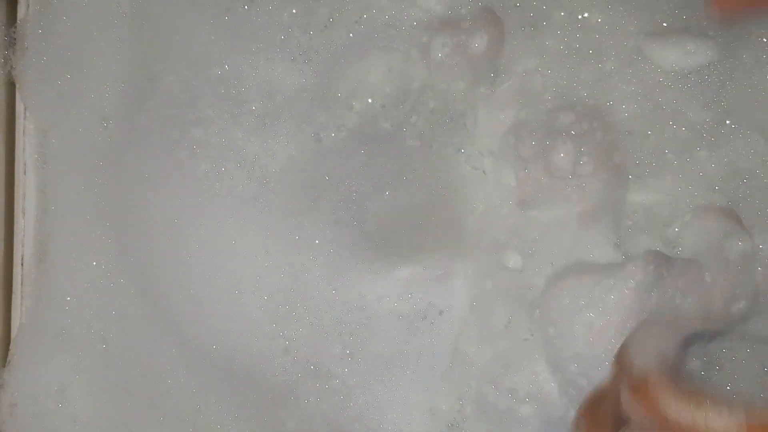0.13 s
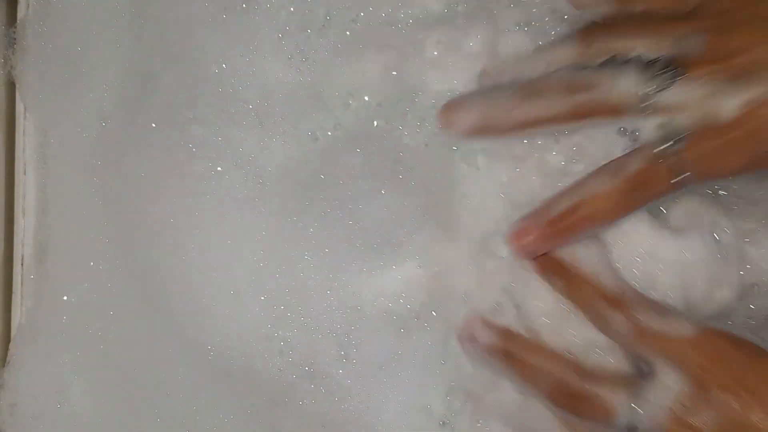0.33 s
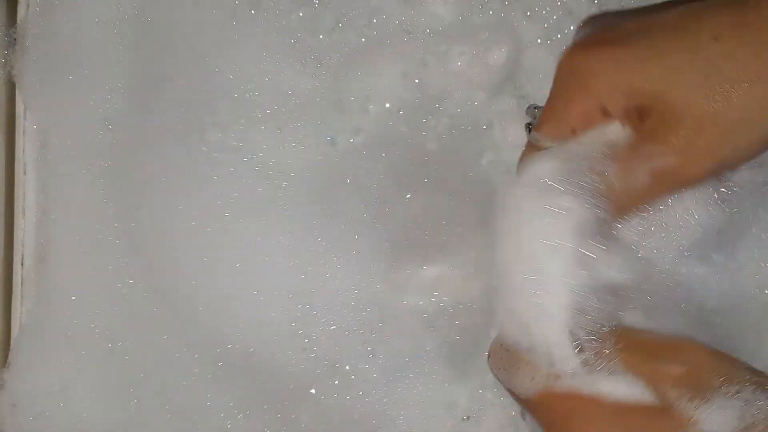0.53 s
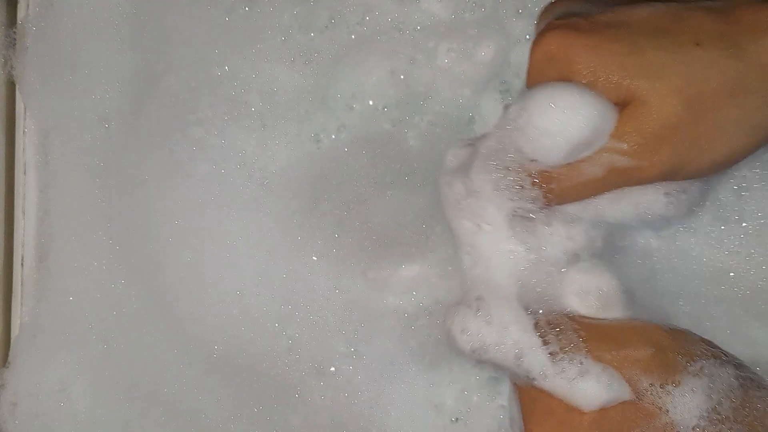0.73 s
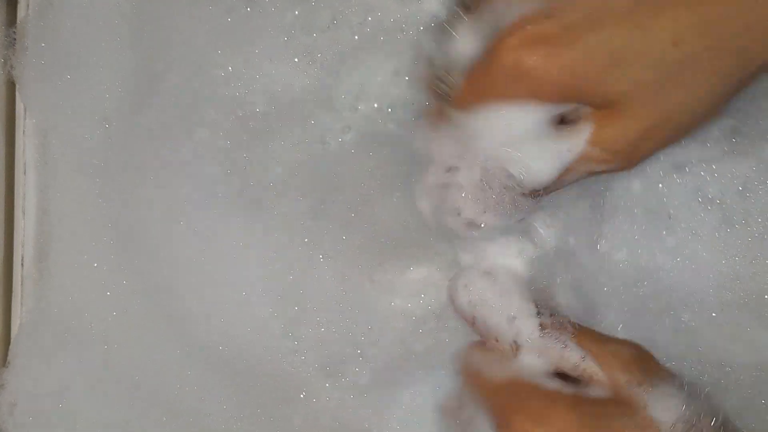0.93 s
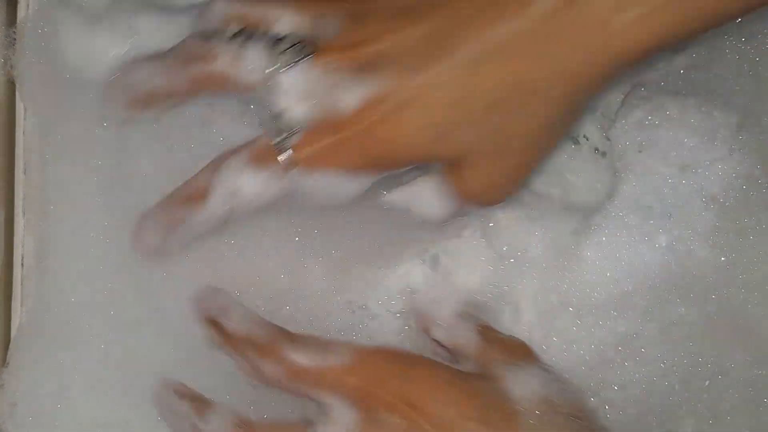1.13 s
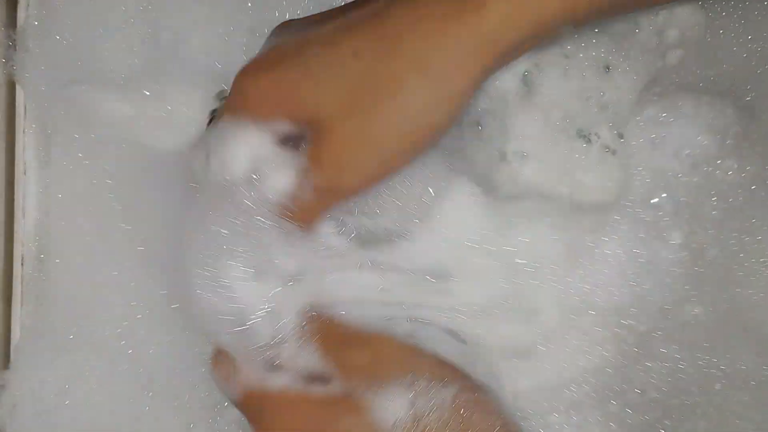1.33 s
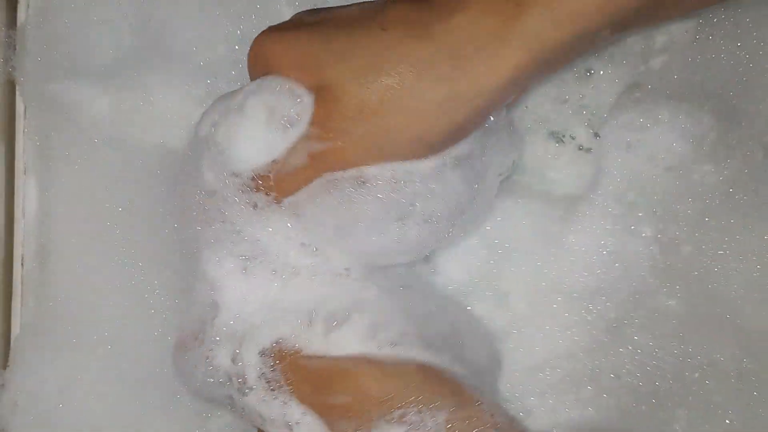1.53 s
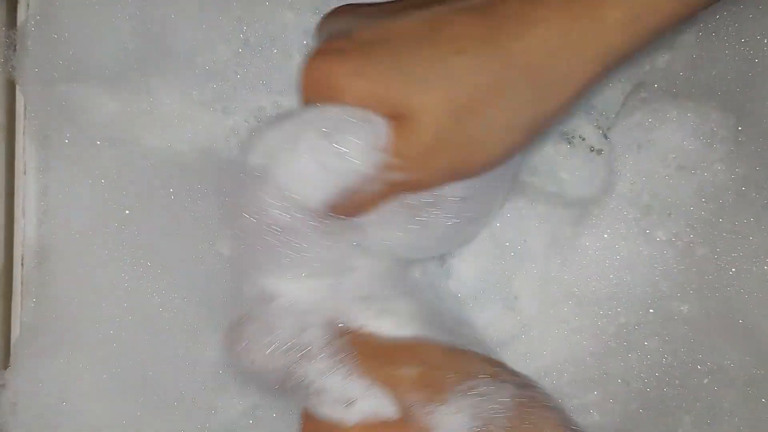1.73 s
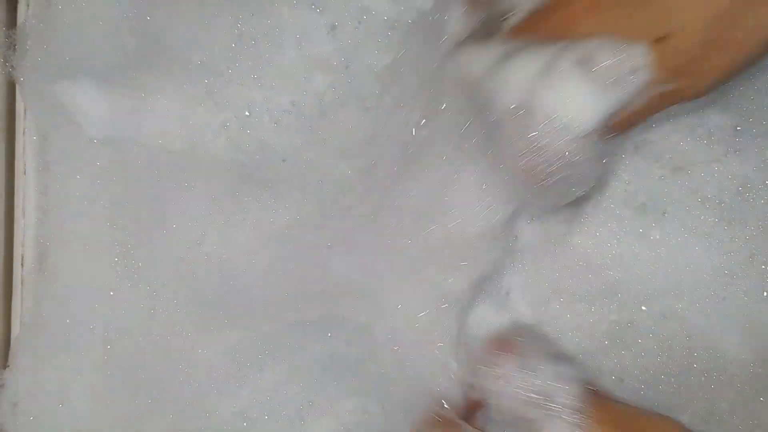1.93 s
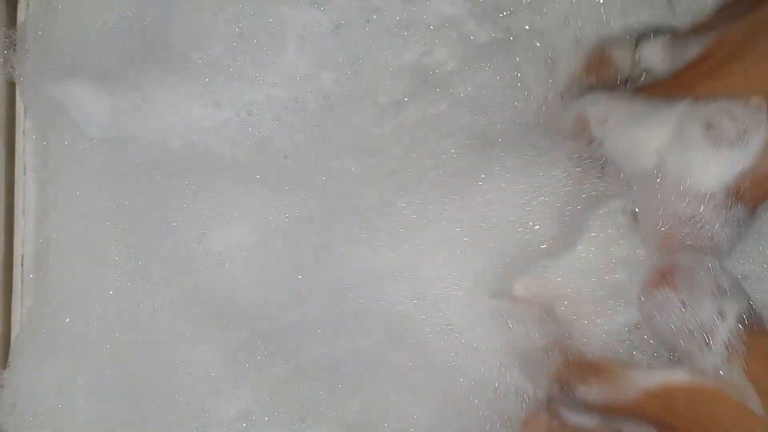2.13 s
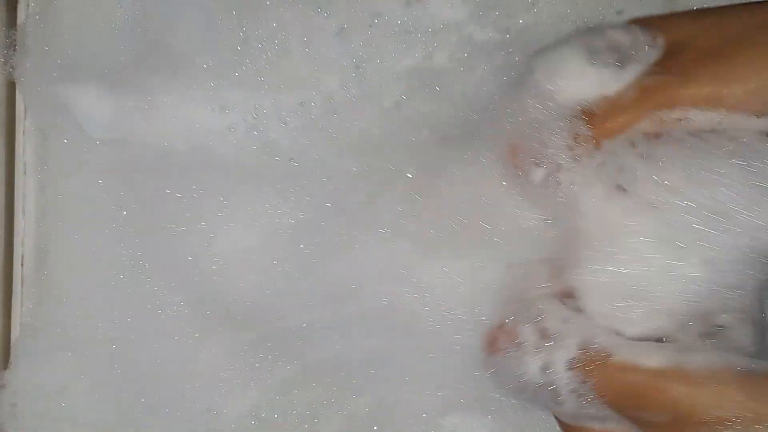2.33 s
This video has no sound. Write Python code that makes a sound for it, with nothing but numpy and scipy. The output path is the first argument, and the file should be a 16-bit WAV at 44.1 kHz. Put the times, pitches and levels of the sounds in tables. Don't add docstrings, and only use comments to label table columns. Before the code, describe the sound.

A soapy sponge is squeezed in foam, heard very close. A faint stroke tail and soft gulp come by 0.15 seconds, a full squelchy squeeze at 0.7-0.9, a gulping release at 1.0, a longer, brighter wet squeeze at 1.6-1.75 ending in sharp bubble ticks, and a short gulp at 1.87. Fine foam crackles between, over a slowly rising low engine drone, with short tiled-room reverberation.

```python
import sys
import numpy as np
from scipy import signal
from scipy.fft import rfft, irfft
from scipy.io import wavfile
from scipy.ndimage import uniform_filter1d

SR = 44100
rng = np.random.default_rng(int(sys.argv[2]) if len(sys.argv) > 2 else 0)


def rack_gain(trim_db):
    fader = np.asarray(trim_db, float)
    return 10 ** (fader / 20)


def inscribe(sig):
    pcm = np.round(np.clip(np.atleast_2d(sig).T, -1, 1) * 32767)
    wavfile.write(sys.argv[1], SR, pcm.astype(np.int16))


N = 105840

# start_s, level_db
FOAM_LEVEL = [(0, -83), (.19, -66), (.24, -77), (.32, -77.5), (.345, -72), (.55, -66.5), (.62, -71.5),
              (1.06, -68.5), (1.18, -74.5), (1.33, -71), (1.42, -65), (1.95, -70), (2.06, -74.5),
              (2.17, -70.5), (2.4, -77.5)]


def evened(x):
    return x / np.sqrt(np.mean(x ** 2) + 1e-20)


def read(points, hz):
    f, value = np.transpose(points)
    return np.interp(np.log(hz + 1), np.log(f + 1), value)


def add(mix, start_s, sound):
    part = mix[round(start_s * SR):][:len(sound)]
    part += sound[:len(part)]


def colour(x, gain_db):
    hz = np.fft.rfftfreq(x.shape[-1], 1 / SR)
    return irfft(rfft(x) * rack_gain(gain_db(hz)), x.shape[-1])


def high_pass_db(hz, corner_hz, floor):
    return 40 * np.log10(np.minimum(hz / corner_hz + floor, 1))


def bubble(hz, cycles, rise):
    u = np.arange(0, 5, hz / cycles / SR)
    envelope = (1 - np.exp(-6 * u)) * np.exp(-1.5 * u)
    return envelope * np.sin(2 * np.pi * cycles * (u + rise * u ** 2 / 2))


def grains(spectrum, per_s, cycles, spread_db, sizes=30):
    out = np.zeros(N)
    for hz in np.geomspace(spectrum[0][0], spectrum[-1][0], sizes):
        when, size = rng.random(N), rng.exponential(1, N)
        stretch, rise = rng.uniform(0.23, 1.59, 2)
        bursts = when < per_s * np.sqrt(hz / 1000) / sizes / SR
        train = bursts * rack_gain(spread_db * np.minimum(size, 4))
        one = bubble(hz, cycles * stretch, 0.12 * (rise - .8))
        sound = signal.oaconvolve(train, one / np.linalg.norm(one))[:N]
        out += rack_gain(read(spectrum, hz)) * hz ** 0.0807 * sound
    return evened(out)


def place(x, lag_samples, pan_db):
    wide, half = np.pad(x, 20), round(lag_samples / 2)
    left = np.roll(wide, half) * rack_gain(pan_db / 2)
    right = np.roll(wide, -half) * rack_gain(-pan_db / 2)
    return np.array([left, right])[:, 20:-20]


def air():
    # freq_hz, density_db_per_hz
    hiss_spectrum = [(250, 7), (400, -4), (700, -15.5), (1100, -21.5), (3400, -29), (8000, -32),
                     (15800, -24.5)]
    a, b, common = rng.standard_normal((3, N))
    ports = np.array([a + .5 * common, b + .5 * common])
    hiss = colour(ports, lambda hz: read(hiss_spectrum, hz) - 60 * (hz < 250))
    foam_db = np.interp(np.arange(N) / SR, *np.transpose(FOAM_LEVEL))
    return rack_gain(-69.5 + 0.38 * (foam_db + 76.0)) * evened(hiss)


def engine():
    # start_s, second_order_db, first_order_db, third_order_db
    order_levels = [(0, -63, -69, -82), (.05, -53, -58.5, -66), (0.159, -45, -59, -53.5),
                    (0.203, -52, -64, -56), (0.288, -42, -56.5, -54.5), (.39, -67.5, -62, -64),
                    (0.507, -42.5, -52.5, -58.5), (.65, -48, -53.5, -55), (.78, -39, -46, -58),
                    (.95, -49.5, -50, -49.5), (1.09, -50, -52.5, -62.5), (1.26, -53.5, -53, -50.5),
                    (1.378, -47.5, -47, -68.5), (1.67, -38, -46.5, -53.5), (1.83, -44.5, -54.5, -54),
                    (1.92, -44.5, -50, -56), (2.111, -45, -57, -66.5), (2.4, -57.5, -52.5, -70.5)]
    # start_s, second_order_hz
    speed_points = [(0, 98.5), (.5, 109), (1.2, 118.5), (1.7, 122), (2.4, 128)]
    # freq_hz, density_db_per_hz
    rumble_spectrum = [(25, -31.5), (45, -1), (82, 8), (140, -0.5), (230, -10), (420, -34), (900, -53)]
    t = np.arange(N) / SR
    s, second, first, third = np.transpose(order_levels)
    turns = np.cumsum(np.interp(t, *np.transpose(speed_points)) / 2) / SR
    tones = np.zeros(N)
    for order, level_db in enumerate([first, second, third - 1.5, third - 12], 1):
        tone = np.sin(2 * np.pi * (order * turns + rng.random()))
        tones += np.sqrt(2) * rack_gain(np.interp(t, s, level_db)) * tone
    rumble, side = evened(colour(rng.standard_normal((2, N)), lambda hz: read(rumble_spectrum, hz)))
    swell = rack_gain(-53.5 + 0.39 * (np.interp(t, s, first) + 49.0))
    centre = (tones + swell * rumble) * rack_gain([[.2], [-.2]])
    return centre + (0.04 * np.roll(tones, 90) + 0.19 * swell * side) * [[1], [-1]]


def foam():
    # freq_hz, density_db_per_hz
    crackle_spectrum = [(2500, -13.5), (4000, -7.5), (6000, -1.5), (8000, 0), (10000, 0), (15500, -3.5)]
    # start_s, level_db, pitch_hz
    ticks = [(.3304, -53, 8470), (.4911, -57, 8000), (.527, -54, 6950), (.569, -53, 8000),
             (.6218, -50, 7110), (.6225, -46, 10500), (.623, -56.5, 14750), (.6497, -50, 7000),
             (.813, -41, 8000), (.8235, -38, 8000), (1.1336, -50.5, 8100), (1.2209, -60, 8230),
             (1.283, -57, 508), (1.3117, -59, 8400), (1.4135, -54, 5450), (1.4923, -52.5, 8310),
             (1.5357, -57, 6980), (1.681, -40.5, 8140), (1.688, -42.5, 8160), (1.696, -43, 8600),
             (1.7015, -37, 8500), (1.712, -31.5, 8450), (1.7195, -36, 8400), (1.7245, -31, 8540),
             (1.7245, -47, 11330), (1.7415, -39, 8200), (1.7495, -50, 8440), (1.911, -45, 7500),
             (2.163, -53, 4150), (2.3214, -54, 8250)]
    centre, left, right = (grains(crackle_spectrum, 1200, 2.2, 3.5, sizes=10) for _ in range(3))
    pops = np.zeros(N)
    for start_s, level_db, hz in ticks:
        add(pops, start_s, rack_gain(level_db) * bubble(hz, 4.5, .03))
    s, crackle_db = np.transpose(FOAM_LEVEL)
    level = rack_gain(np.interp(np.arange(N) / SR, s, crackle_db) - 6.0)
    crackle = place(centre, -4, 0) + 1.41 * np.array([left, right])
    return level * crackle + place(pops, -5, .3)


def snap(level_db, hz, treble_db):
    rise_s, width_octaves, top_hz = .0028, 0.43, 8000
    u = np.arange(1024) / SR / rise_s
    puff = u * np.exp(-2 * u) * rng.standard_normal((3, 1024))

    def shape_db(f):
        peak = 1 / (1 + (np.log2(f / hz + 1e-3) / width_octaves) ** 6)
        skirt = rack_gain(2 * treble_db) * (f > hz)
        return 10 * np.log10((peak + skirt) / (1 + (f / top_hz) ** 7))

    puff = np.roll(colour(puff, shape_db), 40, axis=1)
    return (rack_gain(level_db + 1) * puff / abs(puff).max()).T


def sponge():
    # start_s, gulp_db, squelch_db
    strokes = [
        [(0, -55, -51.5), (.03, -69, -63), (.09, -85, -74)],
        [(.09, -80, -92), (.103, -51, -63), (.125, -49.5, -73), (.16, -60.5, -95), (.27, -72, -103),
         (.3, -85, -97)],
        [(.66, -67, -91), (.71, -60, -75), (.72, -47, -52.5), (.745, -47.5, -57.5), (.767, -32.5, -42),
         (.805, -36.5, -32.5), (.862, -38, -43), (.885, -59, -52), (.965, -59, -63)],
        [(.965, -54, -70), (.982, -40, -39.5), (1.012, -32.5, -42.5), (1.03, -52.5, -53.5), (1.2, -72, -77.5)],
        [(1.5, -83, -88), (1.582, -47, -58.5), (1.6, -36, -42.5), (1.63, -33.5, -40.5), (1.66, -35.5, -38),
         (1.7, -40.5, -34.5), (1.745, -47, -52.5), (1.77, -55, -90), (1.845, -89, -61)],
        [(1.845, -77, -69), (1.863, -41, -56.5), (1.873, -32, -42), (1.91, -37.5, -52), (1.99, -59, -70),
         (2.1, -63.5, -83)],
    ]
    # left_lag_samples, left_right_db, tilt_db_per_octave, cupped_hands_0_1, pores_db
    places = [(-7, 0.5, 8, 0.13, 2.5), (-7, -2.5, 4, 0, 4), (-9, 0.5, 0.5, 0.84, 9),
              (-7.5, 0.5, -3.5, 0.1, -1.5), (10, 1, 1, 0.51, 7), (12.5, 1, 1, 0.33, -3.5)]
    # start_s, level_db, pitch_hz
    pockets = [(.122, -32.5, 652), (.713, -32, 645), (0.72, -32.5, 422), (0.756, -34.5, 532),
               (.794, -26, 382), (.804, -29, 530), (0.844, -43, 520), (.94, -42.5, 387), (.986, -25, 666),
               (1.005, -26.5, 449), (1.596, -31.5, 463), (1.619, -27.5, 407), (1.643, -28, 530),
               (1.662, -27.5, 415), (1.678, -27.5, 454), (1.872, -28, 1106), (1.878, -27, 650),
               (1.886, -27, 644), (1.9, -28.5, 973)]
    # start_s, level_db, centre_hz, treble_db
    snap_events = [(.105, -47, 1510, -25), (.124, -46.5, 1750, -11), (0.7145, -54, 1500, -14),
                   (.7265, -44, 2500, -17), (0.759, -44, 1410, -22), (0.7733, -37.5, 4200, -34),
                   (0.796, -31, 1790, -20), (0.8057, -43, 5150, -18), (0.8107, -36.5, 5100, -32),
                   (0.8219, -38, 5000, -37), (0.837, -48, 4900, -26), (0.844, -32, 3500, -23),
                   (0.856, -27, 2060, -45), (0.862, -39, 4170, -25), (0.907, -33, 1880, -50),
                   (.9822, -34.5, 2300, -31), (1.0066, -34, 1780, -14), (1.5842, -45, 2950, -20.5),
                   (1.589, -35.5, 2490, -13.5), (1.5956, -34, 2480, -11), (1.6004, -26.5, 3030, -16.5),
                   (1.6202, -25, 2230, -16), (1.635, -37.5, 3020, -23.5), (1.6419, -23.5, 2360, -26.5),
                   (1.648, -28, 3500, -6.5), (1.6547, -26.5, 2890, -19), (1.6603, -22, 3350, -8.5),
                   (1.6650, -28, 3060, -6), (1.680, -31.5, 2960, -32), (1.686, -34, 3200, -18.5),
                   (1.693, -29, 3190, -2), (1.697, -29.5, 3400, -14.5), (1.7031, -25, 3430, -19),
                   (1.723, -31.5, 3420, -1.5), (1.730, -36, 2970, -25), (1.747, -45, 3500, -23),
                   (1.867, -46, 2480, -26), (1.872, -57, 2860, -22), (1.9087, -42, 2470, -8)]
    # freq_hz, density_db_per_hz
    gulp_spectrum = [(200, -12.5), (370, -15), (480, 1.5), (680, -4), (1050, -12), (1400, -11)]
    # freq_hz, density_db_per_hz
    squelch_spectrum = [(850, -13), (1300, 3), (2300, 0.5), (3700, -0.5), (5200, -11), (8200, -15.5),
                        (11000, -47), (15500, -51)]
    # freq_hz, width_hz, gain_db
    palm_modes = [(1228, 220, 20.5), (1837, 133, 21), (2200, 130, 11)]
    t, out = np.arange(N) / SR, np.zeros((2, N))
    gulps = grains(gulp_spectrum, 900, 4.13, 0.94)
    squelch = np.array([grains(squelch_spectrum, 3500, 2.22, 2.5, sizes=20) for _ in range(3)])
    clump_samples = 90
    clumps = uniform_filter1d(rng.standard_normal(N), clump_samples)
    squelch = squelch * rack_gain(2.8 * evened(uniform_filter1d(clumps, clump_samples)))
    snaps = np.zeros((N, 3))
    for start_s, *kind in snap_events:
        add(snaps, start_s - 40 / SR, snap(*kind))
    for rows, (lag_samples, pan_db, tilt_db, cupped, pores_db) in zip(strokes, places):
        s, gulp_db, squelch_db = np.transpose(rows)
        inside = np.clip(np.minimum(t - s[0] + 0.009, s[-1] - t + 0.0012) / 0.0086, 0, 1)

        def hands_db(hz):
            tilt = tilt_db * np.log2(hz / 2500 + 0.029)
            palms = sum(db / (1 + ((hz - f) / w) ** 2) for f, w, db in palm_modes)
            pores = np.exp(-((hz - 3060) / 1760) ** 2)
            return tilt + cupped * palms + pores_db * pores

        bright = inside * evened(colour(squelch, hands_db)) * rack_gain(np.interp(t, s, squelch_db) - 1.5)
        bright = bright + inside * snaps.T
        x = inside * gulps * rack_gain(np.interp(t, s, gulp_db) - 4.0) + bright[0]
        for start_s, level_db, hz in pockets:
            if s[0] <= start_s < s[-1]:
                add(x, start_s, rack_gain(level_db) * bubble(hz, 6.33, 0.071))
        out += place(x, lag_samples, pan_db) + 0.65 * bright[1:]
    return colour(out, lambda hz: high_pass_db(hz, 220, 0.001027))


def room(x):
    # freq_hz, t60_s
    decay_times = [(300, 0.24), (1500, 0.25), (6000, 0.23), (12000, 0.11)]
    taps = np.zeros((2, SR // 2))
    at = np.arange(120, SR // 2 - 20, 20)
    at = at + rng.integers(0, 20, (2, len(at)))
    np.put_along_axis(taps, at, rng.choice([-1., 1.], at.shape), 1)
    hz, t, z = signal.stft(taps, SR, nperseg=256)
    decay = rack_gain(-60 * t / read(decay_times, hz)[:, None])
    tail = signal.istft(z * decay, SR, nperseg=256)[1]
    return signal.fftconvolve(x, tail / np.linalg.norm(tail[0]), axes=1)[:, :N]


def scene():
    near = sponge()
    wet = room(near)
    mid = wet.mean(0)
    side = colour((wet[0] - wet[1]) / 2, lambda hz: high_pass_db(hz, 600, 0.0011))
    return near + rack_gain(-6) * np.array([mid + side, mid - side]) + foam() + engine() + air()


def roll_off(x):
    return signal.sosfilt(signal.butter(12, 15900, fs=SR, output="sos"), x)


def record(dry):
    # freq_hz, left_right_db
    port_pan = [(250, 0), (600, -3.5), (2200, 2.5), (4500, -0.5), (9000, -0.5)]
    # freq_hz, gain_db
    mic_response = [(3000, 0.5), (4300, 0), (5200, 0.5), (7000, 0.5), (8400, 1), (9400, -5), (12000, -4)]
    mid, side = dry.mean(0), (dry[0] - dry[1]) / 2
    side = colour(side, lambda hz: -20.5 * np.exp(-(np.log2(hz / 300 + 0.00097) / 0.46) ** 2))
    ports = []
    for way in (1, -1):

        def port_db(hz):
            return way * read(port_pan, hz) / 2 + read(mic_response, hz) - 60 * (hz > 15850)

        ports.append(colour(mid + way * side, port_db))
    return roll_off(np.array(ports))


dry = scene()
out = record(dry)
inscribe(out)
```